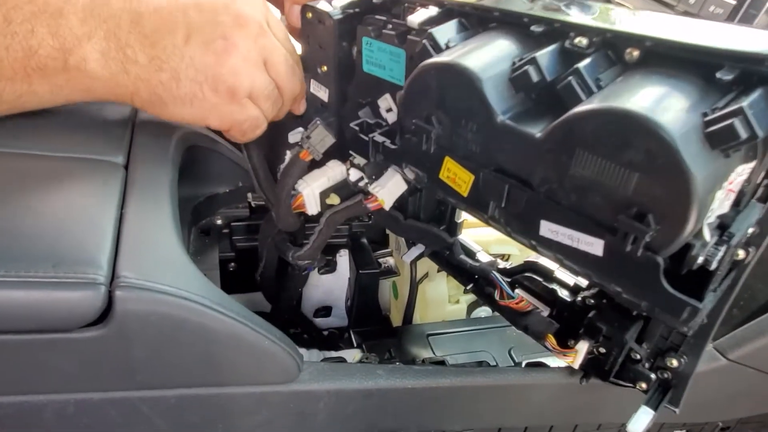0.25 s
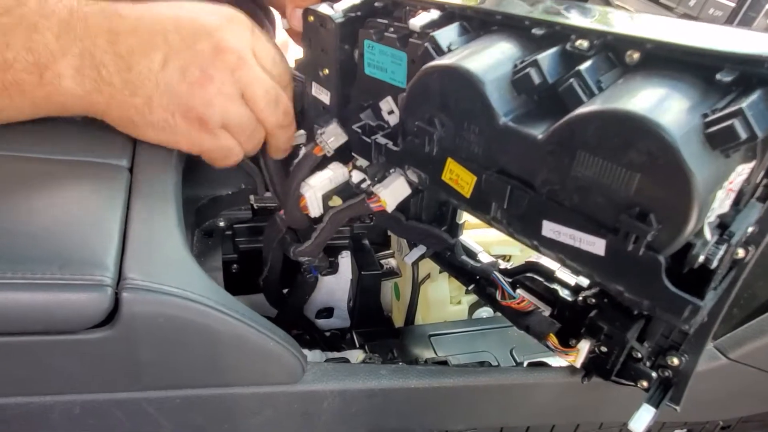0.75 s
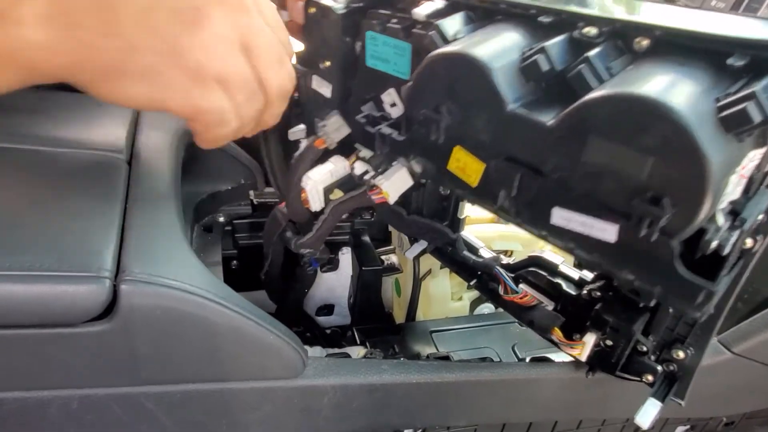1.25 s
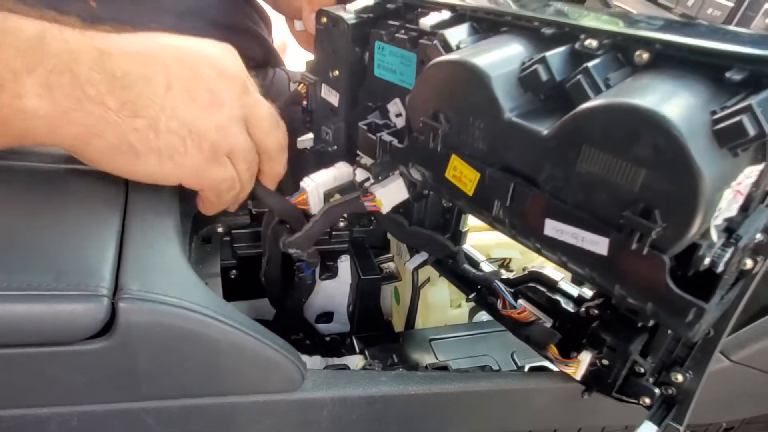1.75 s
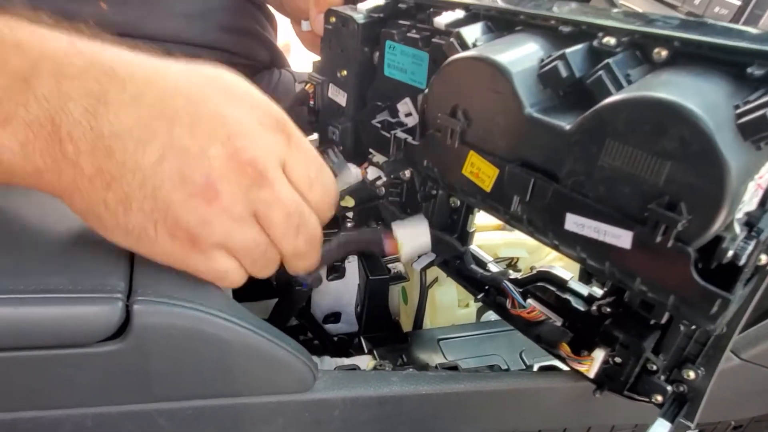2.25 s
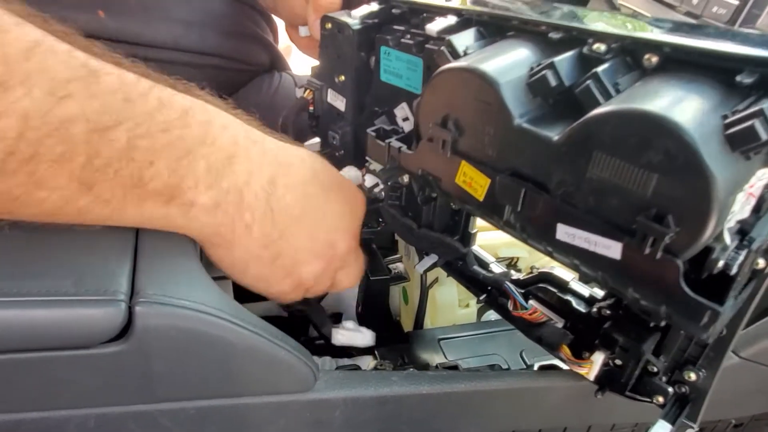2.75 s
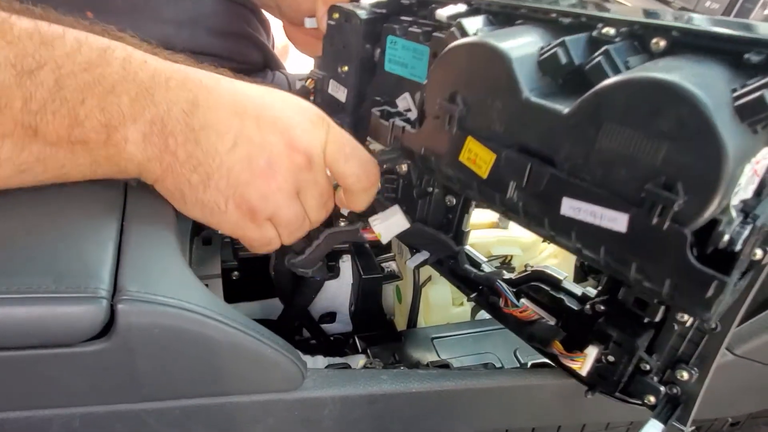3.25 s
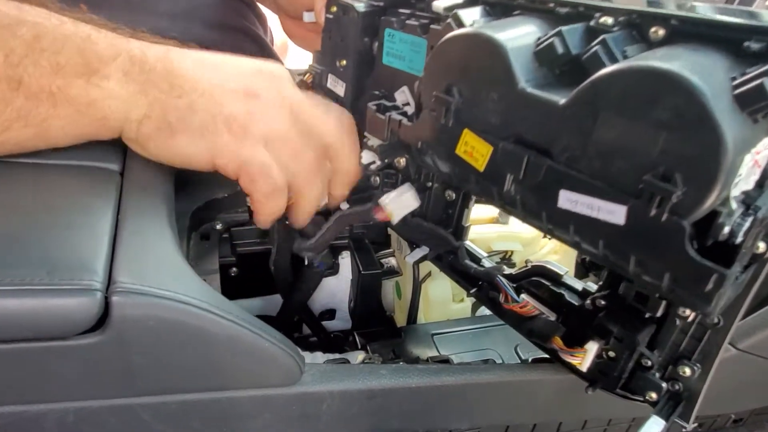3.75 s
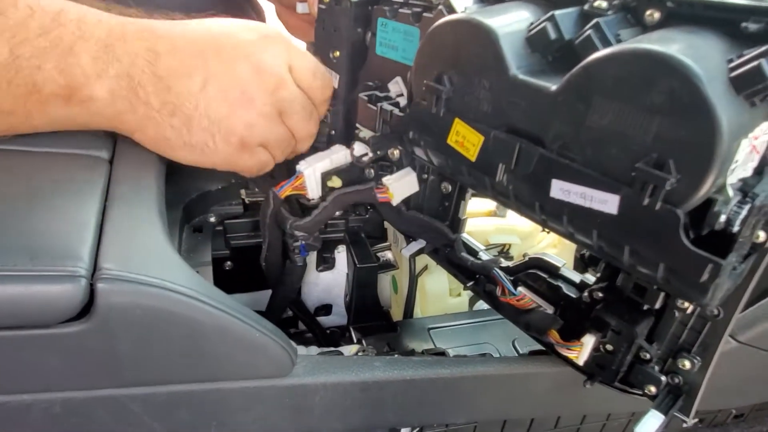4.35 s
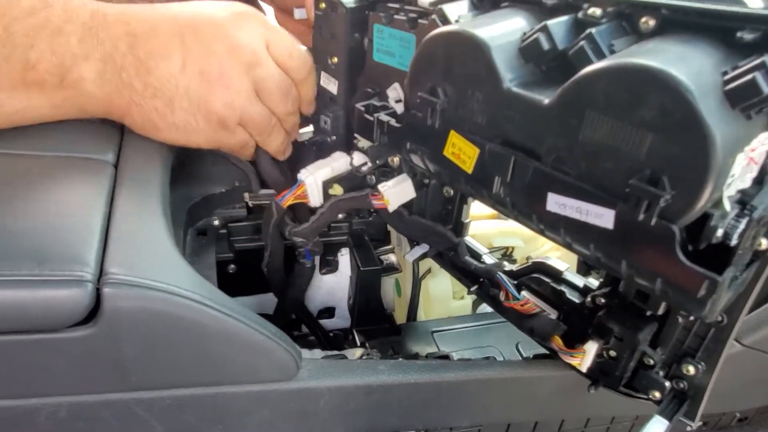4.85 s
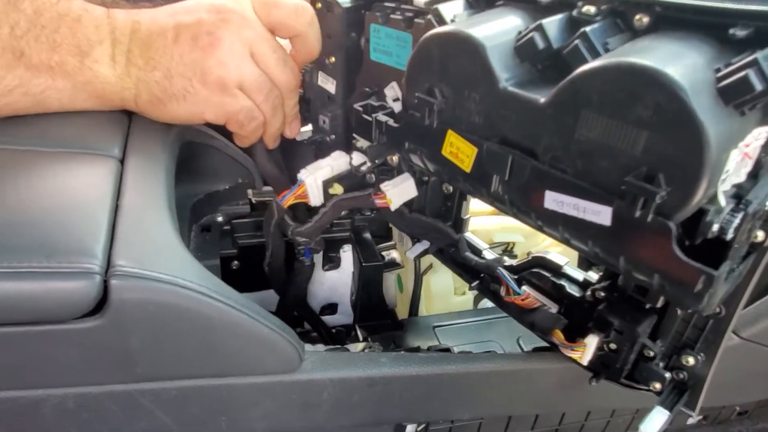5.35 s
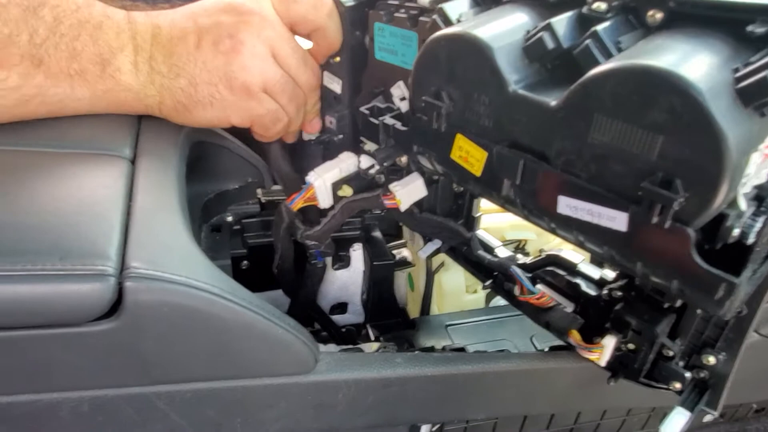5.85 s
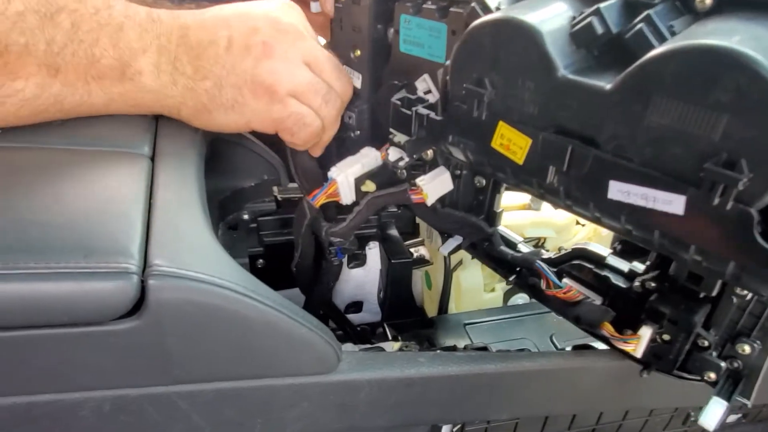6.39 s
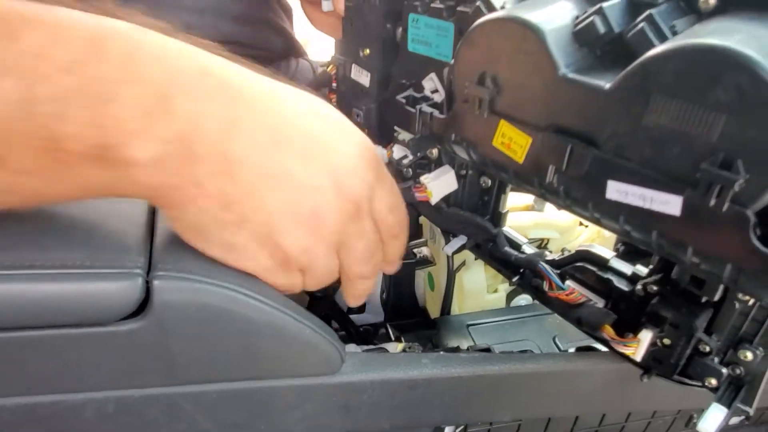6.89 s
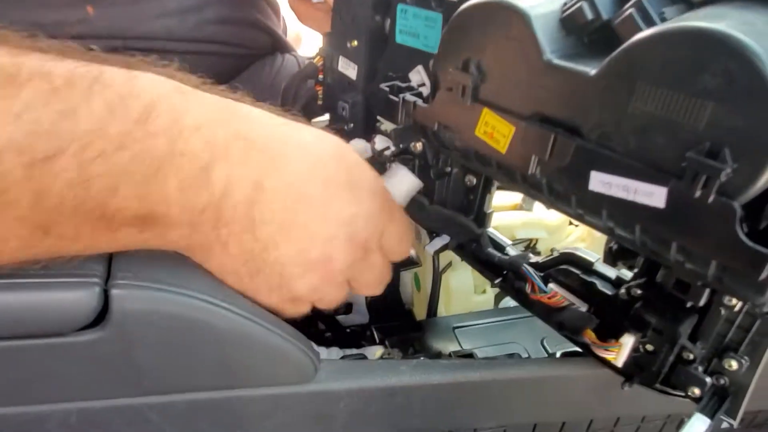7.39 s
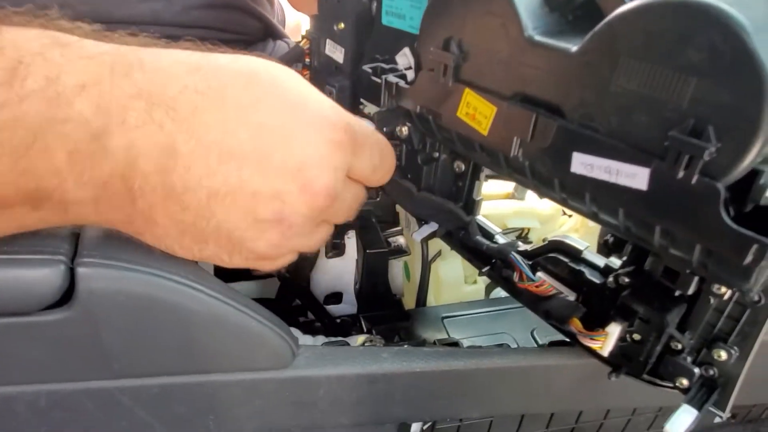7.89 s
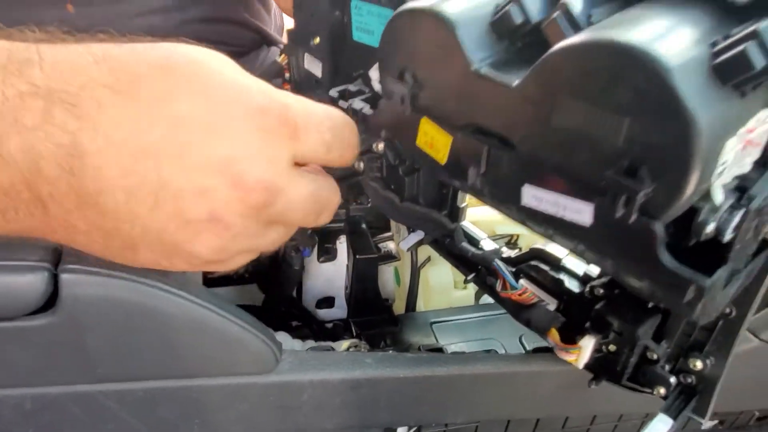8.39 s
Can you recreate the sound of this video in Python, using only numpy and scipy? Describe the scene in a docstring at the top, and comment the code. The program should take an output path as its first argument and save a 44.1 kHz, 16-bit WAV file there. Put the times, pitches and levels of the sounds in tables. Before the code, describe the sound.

Irregular plastic clicks, some sharp and snappy, others rounded and hollow, come from connectors knocking on car trim. Brief cable scuffs and skin rubs surround them, with soft low thuds as the hand pushes the console. A busy rattle fills the middle, then the activity thins, with one tiny rough squeak late on. Close-miked in a small, dry car interior with faint rumble.

```python
"""A hand tugs a wiring loom around the opened centre console of a parked car.
From the start the cabin rumbles faintly (shaped noise) while cables and a forearm drag (grainy noise).
Soon plastic connectors click on the hollow trim (decaying tones and noise), then plugs scuff it (gliding
resonances) and brisk strokes rub it (swelling noise). Later the hand bumps and pushes the console
(dull noise, low decaying tones), and near the end plastic squeaks once (a rough, falling tone)."""
import sys
import numpy as np
from scipy import signal
from scipy.fft import rfft, irfft, next_fast_len
from scipy.io import wavfile
from scipy.ndimage import map_coordinates

SR = 44100
rng = np.random.default_rng(int(sys.argv[2]) if len(sys.argv) > 2 else 0)


def wav_record(signal):
    """Record a signal, one row per channel, as 16-bit PCM in the file named by sys.argv[1]."""
    frames = np.transpose(np.atleast_2d(signal))
    bounded = np.clip(frames, -1, 1)
    # unit amplitude maps onto the largest positive 16-bit level
    quanta = np.round(bounded * 32767).astype(np.int16)
    wavfile.write(sys.argv[1], SR, quanta)


N = 380583  # length of the scene in samples


def amp(db):
    """Turn decibels into a gain."""
    return 10 ** (np.asarray(db) / 20)


def unit(x):
    """Scale a sound to an average (rms) strength of 1."""
    return x / np.sqrt(np.mean(x ** 2) + 1e-20)


def along(points, hz):
    """Read a curve of (Hz, value) points at any frequency, on a log frequency axis."""
    f, v = np.transpose(points)
    return np.interp(np.log(hz + 1), np.log(f + 1), v)


def fade(t, t60):
    """Die away by 60 dB in t60 seconds."""
    return np.exp(-np.log(1000) * t / t60)


def filtered(x, response):
    """Multiply the spectrum of x by a response that depends on frequency."""
    n = x.shape[-1]
    m = next_fast_len(n + 2048)
    return irfft(rfft(x, m) * response(np.fft.rfftfreq(m, 1 / SR)), m)[..., :n]


def wobble(rate):
    """Draw a smooth random curve as long as the scene, with rate random points a second."""
    points = rng.standard_normal(int(N * rate / SR) + 4)
    return map_coordinates(points, [np.arange(N) * rate / SR])


def delayed(x, s):
    """Make x later by s seconds."""
    return np.pad(x, (max(round(s * SR), 0), 0))[:len(x)]


def add(track, s, sound):
    """Mix a sound into the track at s seconds."""
    part = track[:, max(round(s * SR), 0):][:, :sound.shape[-1]]
    part += sound[..., :part.shape[-1]]


# how alike diffuse noise is at the two microphones: (frequency [Hz], likeness [1 = same, 0 = unrelated]);
# likeness above 1 counts as 1
ALIKE = [(60, 1.28), (290, 0.74), (640, .5), (1400, 0), (7000, 0.13)]


def noise(spectrum, size, grit_db=0):
    """Diffuse stereo noise of rms 1, alike in the bass; grit makes grains that ring in its resonances."""
    grains = map_coordinates(rng.standard_normal(size // 64 + 4), [np.arange(size) / 64], order=1)
    white = rng.standard_normal((2, size)) * amp(grit_db * grains)

    def mid_and_side(hz):
        turn = np.arccos(np.clip(along(ALIKE, hz), -1, 1)) / 2
        return amp(along(spectrum, hz)) * [np.cos(turn), np.sin(turn)]

    mid, side = filtered(white, mid_and_side)
    return unit(np.array([mid + side, mid - side]))


def spot(spectrum, colour_db):
    """The spectrum with the random resonances of one spot on the trim."""
    hz = np.geomspace(100, 16000, 60)
    return np.c_[hz, along(spectrum, hz) + colour_db * rng.standard_normal(len(hz))]


def ports(x, lead_s=0.00012):
    """The left microphone port hears a direct sound first, by an amount that depends on where it starts."""
    return np.array([x, delayed(x, lead_s * rng.uniform(0.56, 1.8))])


# ringing modes of the trim panel: (frequency [Hz], relative level [dB], time to fade by 60 dB [s])
PANEL = [(301, -16.5, 0.28), (499.7, 9.5, 0.063), (557.6, 6.5, 0.085), (748.5, -3, 0.092), (848, 0, 0.052),
         (1494, 7.5, 0.066), (1684, 0, 0.13), (1816, 3, 0.043), (2037, 5, 0.072), (3300, -12.5, 0.051),
         (3567, 6, 0.042), (3990, 0.5, 0.034)]
# spectrum of a plastic crack: (frequency [Hz], relative level [dB])
CRACK = [(250, -11.5), (900, 0), (1700, 6), (2500, 4), (3600, -1.5), (5000, -9), (7500, -14), (9500, -23),
         (13000, -16.5), (16000, -25.5)]


def contact(panel_db=-2, cabin_db=-3.5, crack_t60=0.012, cabin_t60=0.059, echo=0.34, echo_s=.0031,
            rise=0.01, colour_db=5):
    """One plastic contact: a crack, the panel's modes and the cabin's short answer."""
    t = np.arange(SR // 10) / SR
    hz, db, t60 = np.transpose(PANEL)[:, :, None]
    strength = amp(db + 5.8 * rng.standard_normal(hz.shape))  # each spot excites the modes differently
    tones = np.sin(2 * np.pi * (hz * t + rng.random(hz.shape)))
    panel = np.sum(strength * tones * fade(t, t60), axis=0)
    crack = noise(spot(CRACK, colour_db), len(t))[0] * fade(t, crack_t60)
    crack = crack + echo * delayed(crack, echo_s * rng.uniform(.85, 1.3))  # a near wall of the cabin
    direct = (unit(crack) + amp(panel_db) * unit(panel)) * (1 - fade(t, rise))
    cabin = noise(spot(CRACK, colour_db), len(t)) * fade(t, cabin_t60) * (1 - fade(t, 0.007))
    return unit(ports(direct)) + amp(cabin_db) * unit(cabin)


# spectrum of the noise in the car: (frequency [Hz], relative level [dB])
RUMBLE = [(20, -1.5), (75, 5), (130, -5.5), (280, -18.5), (520, -19.5), (900, -22.5), (2500, -29.5),
          (6500, -35.5), (8500, -45.5), (15000, -38.5)]


def cabin_rumble(rumble_db=-53.5):
    """Low outdoor noise and a faint hiss fill the car, wavering slightly."""
    return amp(rumble_db + 0.43 * wobble(3.4)) * noise(RUMBLE, N)


# slow drag of loom and forearm: (time [s], relative cable scrape level [dB], relative skin hiss level [dB])
DRAG = [(0.0, -67, -86.5), (0.53, -78, -100), (0.641, -55, -63), (2.042, -62, -67), (2.481, -57.5, -62),
        (3.22, -52, -66), (3.629, -54, -65), (3.74, -74.5, -81), (3.97, -53, -54), (4.44, -59.5, -70.5),
        (4.8, -53.5, -63.5), (5.7, -56, -60), (5.9, -55, -77.5), (6.301, -54, -69), (6.66, -57, -58),
        (7.702, -75.5, -71.5), (8.63, -56, -68)]
# spectrum of cable scraping on trim: (frequency [Hz], relative level [dB])
SCRAPE = [(100, 3), (300, -6.5), (400, 1), (520, 5.5), (700, -4), (1050, -2), (1800, -2), (2800, -10.5),
          (4500, -22.5), (9000, -49)]
# spectrum of skin hissing on trim: (frequency [Hz], relative level [dB])
HISS = [(800, -26), (2500, -1), (4200, 0.5), (7200, 0), (8500, -12), (12500, -4.5), (16000, -10)]


def dragging(cable_db=-3, skin_db=-4, colour_db=4, grit_db=6, skin_grit_db=2, creep_db=3,
             ticks_per_s=12, loose_db=-13, loose_range_db=10):
    """The loom and forearm creep from spot to spot over the trim, and loose plugs tick."""
    s, *levels = np.transpose(DRAG)
    scrape, hiss = (np.interp(np.arange(N) / SR, s, db) for db in levels)
    cable, skin, ticks = np.zeros((3, 2, N))
    # half-second stretches, each on a new spot, overlap by half
    window = np.sin(np.linspace(0, np.pi, SR // 2))
    for start in np.arange(0, N, len(window) // 2) / SR:
        add(cable, start, window * noise(spot(SCRAPE, colour_db), len(window), grit_db))
        add(skin, start, window * noise(spot(HISS, colour_db / 2), len(window), skin_grit_db))
    for when, force in rng.random((round(ticks_per_s * N / SR), 2)):
        tick_db = scrape[int(when * N)] + loose_db + loose_range_db * force
        add(ticks, when * N / SR, amp(tick_db) * contact())
    drag = amp(scrape + cable_db) * cable + amp(hiss + skin_db) * skin
    return amp(creep_db * wobble(22)) * drag + ticks  # the drag is uneven


def shell(pitch, hold=0.0038, rise=0.0044, t60=0.016, ring_db=-27, ring_hz=1705, ring_t60=0.08,
          tuning_octaves=0.12, wall_db=-13):
    """A hollow shell sounds during contact and dies fast; the nearer its pitch to the panel's, the more it rings."""
    t = np.arange(SR // 10) / SR
    # lower and upper wall modes, changed by the grip
    walls = pitch * rng.uniform([[.66], [1.17]], [[.86], [1.45]])
    note = np.sin(2 * np.pi * pitch * t) + amp(wall_db) * np.sin(2 * np.pi * walls * t).sum(axis=0)
    brevity = min(pitch / ring_hz, 1) ** 2  # low, blunt contacts are over sooner
    note = note * fade(np.maximum(t - hold * brevity, 0), t60 * brevity)
    sympathy = 1 / np.hypot(1, np.log2(pitch / ring_hz) / tuning_octaves)
    ring_tone = np.sin(2 * np.pi * ring_hz * rng.normal(1, 0.018) * t)
    ring = sympathy * amp(ring_db) * ring_tone * fade(t, ring_t60)
    return unit(ports((note + ring) * (1 - fade(t, rise))))


# connector strikes:
# (time [s], shell pitch [Hz], shell level [dB], hardness [0-1], panel knock level [dB])
CLICKS = [(0.144, 1580, -56, 0.35, -44), (0.242, 1890, -33.5, 0.25, -42.5), (0.298, 1634, -24, 0.55, -36.5),
          (0.432, 1620, -48.5, 0.48, -45), (0.593, 1540, -43.5, 0.62, -51.5), (0.705, 1630, -35, 0.25, -49),
          (1.011, 1477, -19.5, 0.54, -24), (1.028, 1930, -20, 0.8, -33.5), (1.244, 1530, -34, 0, -40),
          (1.272, 1570, -44, 0.83, -46.5), (1.466, 1500, -46.5, 0.9, -46.5),
          (1.512, 1575, -23, 0.35, -34.5), (1.57, 1710, -31.5, 0.31, -37), (2.482, 1130, -32, 0.53, -61),
          (2.611, 1230, -36, 0.24, -52.5), (2.632, 1280, -26, 0, -50), (2.644, 1640, -28, 0.14, -51),
          (2.666, 1190, -35.5, 0.27, -47), (2.872, 990, -39, 0.6, -39.5), (3.154, 1570, -30, 0.59, -37),
          (3.323, 1600, -29, 0.58, -32.5), (3.351, 930, -38.5, 0.1, -56), (3.7879, 1750, -23, 0.51, -33.5),
          (3.821, 1690, -25, 0.38, -38.5), (3.836, 1910, -35.5, 0.4, -45), (3.92, 1670, -27.5, 0.46, -32),
          (3.927, 1680, -21.5, 0.4, -39.5), (3.936, 1570, -26.5, 0.33, -42), (3.965, 1470, -36, 0.5, -36.5),
          (4.008, 1880, -31, 0.46, -54), (4.133, 2030, -22.5, 0.41, -37), (4.138, 1680, -31, 0.54, -38.5),
          (4.257, 2996, -22, 0.08, -46), (4.335, 1680, -20.5, 0.24, -48), (4.3484, 1720, -18, 0.11, -37.5),
          (4.3903, 1680, -19.5, 0.26, -37.5), (4.482, 1734, -23.5, 0, -40),
          (4.4924, 1678, -12.5, 0.14, -54), (4.859, 1485, -40, 0.4, -46.5), (5.37, 1550, -39, 0, -53),
          (5.594, 1524, -30.5, 0.23, -39.5), (6.005, 1660, -36, 0.31, -53), (6.349, 1440, -31, 0.81, -35.5),
          (7.012, 1640, -42.5, 0.23, -61), (7.039, 1070, -33, 0.49, -44),
          (7.4514, 1727, -23.5, 0.51, -27.5), (7.503, 1154, -39.5, 0.31, -43.5),
          (7.519, 1460, -43.5, 0.27, -44), (7.552, 1830, -44.5, 0.72, -44), (7.816, 2134, -30, 0.27, -40.5),
          (8.108, 1740, -51.5, 0.52, -55), (8.209, 1840, -54.5, 0.74, -56.5),
          (8.32, 1810, -48.5, 0.49, -56.5), (8.544, 1810, -46.5, 0.33, -68)]
# frequency ranges of shell, knock, edge and snap, one row each: (low [Hz], high [Hz])
RANGES = [(900, 2400), (290, 900), (2250, 4600), (5600, 16000)]
# edge and snap relative to the shell, one row each: (level when blunt [dB], gain at full hardness [dB])
TOUCH = [(-17.5, 24), (-38.5, 45.5)]


def connectors(rattle_db=9, lead_in_db=-12, lead_in_t60=0.045, lead_in_grit_db=5):
    """Connectors strike, each after a short swell of faint noise; hardness sets the edge and snap."""
    out = np.zeros((2, N))
    filters = [signal.butter(3, edges, "bandpass", fs=SR, output="sos") for edges in RANGES]
    span = SR / 100  # a level is the click's energy spread over 10 ms
    before = np.arange(SR // 30)[::-1] / SR  # seconds left until the strike
    for s, pitch, shell_db, hardness, knock_db in CLICKS:
        edge_db, snap_db = (shell_db + blunt_db + hard_db * hardness for blunt_db, hard_db in TOUCH)
        hit = contact()
        parts = [unit(signal.sosfilt(sos, hit)) for sos in filters]
        # a blunt contact gives the shell's clean note, a hard one rattles the whole panel
        rattle = amp(rattle_db + edge_db - shell_db)
        parts[0] = unit(shell(pitch) + rattle * parts[0])
        levels = (shell_db, knock_db, edge_db, snap_db)
        click = sum(amp(db) * part for db, part in zip(levels, parts))
        add(out, s - .0005, click * np.sqrt(span / hit.shape[1]))
        lead_in = noise(CRACK, len(before), lead_in_grit_db) * fade(before, lead_in_t60)
        add(out, s - before[0], amp((shell_db + edge_db) / 2 + lead_in_db) * lead_in)
    return out


# plugs and taped cable scuff the trim:
# (middle [s], half length [s], resonance at the middle [Hz], glide [octaves/s], level [dB])
SCUFFS = [(0.148, 0.0057, 4750, -1.5, -49.5), (3.071, 0.027, 1150, 3, -43.5),
          (3.188, 0.011, 1356, -18, -39), (3.773, 0.012, 1310, 13.5, -42), (6.28, 0.011, 1510, -1, -49),
          (6.665, 0.02, 2760, 7.5, -42)]
# resonances of a scuff: (multiple of the lowest [ratio], relative level [dB])
SCUFF_MODES = [(1, 0.5), (1.601, -11), (2.7, -17)]


def scuffs(width=0.21, grit_db=1.5):
    """Friction rings in a few broad resonances that shift as the contact point slides."""
    out = np.zeros((2, N))
    for s, half, hz, glide, db in SCUFFS:
        t = np.arange(-2 * half, 2 * half, 1 / SR)
        phase = 2 * np.pi * np.cumsum(hz * 2 ** (glide * t)) / SR
        # slow noise on each tone broadens it into a resonance
        sos = signal.butter(2, width * hz, fs=SR, output="sos")
        slips = signal.sosfilt(sos, rng.standard_normal((len(SCUFF_MODES), 2, len(t))))
        ring = 0
        for (k, level), (a, b) in zip(SCUFF_MODES, slips):
            ring = ring + amp(level) * (a * np.cos(k * phase) + b * np.sin(k * phase))
        grit = amp(grit_db * np.interp(t, np.linspace(t[0], t[-1], 20), rng.standard_normal(20)))
        swell = np.exp(-(t / half) ** 2)
        add(out, s + t[0], ports(amp(db) * unit(ring * grit) * swell))
    return out


# brisk strokes of hand and cable over the trim:
# (middle [s], half length [s], relative level [dB], skin hiss over the scrape [dB])
STROKES = [(0.282, 0.022, -49.5, -29.5), (0.959, 0.098, -49.5, -19.5), (1.173, 0.039, -47.5, -14),
           (1.298, 0.058, -45, -13), (1.659, 0.086, -55, -4.5), (1.93, 0.045, -58.5, 0),
           (2.509, 0.12, -51.5, -2.5), (2.644, 0.021, -40.5, -25.5), (2.884, 0.098, -51, -6.5),
           (3.106, 0.054, -51, -1.5), (3.299, 0.13, -51, -7), (3.808, 0.058, -54, -7.5),
           (3.89, 0.029, -48, -1.5), (5.159, 0.088, -52, -18.5), (5.788, 0.05, -48, -28.5),
           (6.208, 0.03, -50, -27), (6.296, 0.025, -46.5, -32), (6.61, 0.12, -49, -16.5),
           (6.728, 0.067, -60.5, 3.5), (7.055, 0.056, -54.5, -8), (7.209, 0.041, -53, -2)]


def rubbing(colour_db=4, grit_db=6, skin_grit_db=4, tick_db=-11, count=5):
    """Each stroke swells and fades, wakes its own resonances in the trim and sheds a few tiny ticks."""
    scrapes, ticks = np.zeros((2, N)), np.zeros((2, N))
    for s, half, db, skin_db in STROKES:
        t = np.arange(-2 * half, 2 * half, 1 / SR)
        cable = amp(db) * noise(spot(SCRAPE, colour_db), len(t), grit_db)
        skin = amp(db + skin_db) * noise(HISS, len(t), skin_grit_db)
        swell = np.exp(-(t / half) ** 2)
        add(scrapes, s + t[0], (cable + skin) * swell)
        for when, force in rng.standard_normal((count, 2)):
            add(ticks, s + .5 * half * when, amp(db + tick_db + 2 * force) * contact())
    grip_db = 4.0 * wobble(25) + 2.3 * wobble(90)  # the surfaces catch and slip
    return amp(grip_db) * scrapes + ticks


# blows of hand and loom on the console, also played by pushes():
# (time [s], relative dull knock level [dB], relative push level [dB])
BUMPS = [(0.901, -49.5, -35), (1.013, -29.5, -35.5), (1.143, -36.5, -59), (1.18, -32.5, -57.5),
         (1.29, -52, -31.5), (2.484, -31, -30), (2.871, -46.5, -32.5), (3.2, -41, -38.5),
         (3.325, -29.5, -29.5), (3.523, -29, -38), (3.792, -34.5, -30.5), (3.979, -23, -38),
         (5.118, -46, -32.5), (5.84, -36, -38), (6.272, -24, -37.5), (6.536, -53, -34.5),
         (7.047, -38, -35.5)]
# spectrum of a dull knock: (frequency [Hz], relative level [dB])
THUD = [(80, -10), (145, 3), (200, -3.5), (300, 1.5), (450, -1.5), (900, -5.5), (3000, -36)]
# air resonances of the hollow console: one frequency [Hz] each
HOLLOW = [189.5, 294.7]


def thuds(thud_db=-8.5, hollow_db=-1, t60=0.16, rise=0.009):
    """Flesh and taped cable give dull knocks that wake the hollow of the console."""
    out, t = np.zeros((2, N)), np.arange(SR // 6) / SR
    for s, db, _ in BUMPS:
        hollow = sum(np.sin(2 * np.pi * (hz * t + rng.random())) for hz in HOLLOW)
        knock = noise(THUD, len(t)) + amp(hollow_db) * hollow
        add(out, s, amp(db + thud_db) * knock * fade(t, t60) * (1 - fade(t, rise)))
    return out


def pushes(boom_db=-1, boom_hz=68, sway_hz=38, sway_db=-8, t60=0.24, rise=0.0082,
           rock_back_s=0.062, rock_back_db=-3):
    """A push rocks the console forth and back on its mounts and booms in the cabin."""
    out, t = np.zeros((2, N)), np.arange(SR // 3) / SR
    for s, _, db in BUMPS:
        for lag, change_db in (0, 0), (rock_back_s, rock_back_db):
            hz = np.array([[boom_hz], [sway_hz]]) * np.exp(rng.normal(0, 0.12, (2, 1)))
            boom, sway = np.sin(2 * np.pi * (hz * t + rng.random((2, 1))))
            rocking = (boom + amp(sway_db) * sway) * fade(t, t60) * (1 - fade(t, rise))
            add(out, s + lag, amp(db + boom_db + change_db) * rocking)
    return out


def squeak(middle_s=7.388, half=0.024, pitch_hz=1450, fall_octaves_per_s=7, squeak_db=-49, jitter=0.12):
    """Plastic sticks and slips on plastic for a moment: a thin, rough, falling squeak."""
    t = np.arange(-3 * half, 3 * half, 1 / SR)
    rate = pitch_hz * 2 ** (-fall_octaves_per_s * t) * (1 + jitter * wobble(2100)[:len(t)])
    phase = 2 * np.pi * np.cumsum(rate) / SR
    tone = sum(np.sin(k * phase) / np.sqrt(k) for k in range(1, 4))
    level = amp(squeak_db + 7.6 * np.tanh(wobble(175)[:len(t)]))
    out = np.zeros((2, N))
    add(out, middle_s + t[0], ports(level * tone * np.exp(-(t / half) ** 2)))
    return out


# balance of the two sides: (frequency [Hz], left minus right [dB])
LEAN = [(60, -1.5), (200, 0.5), (400, -3), (700, -0.5), (1400, -6.5), (2400, -3), (4400, -8), (8000, 0.5),
        (14000, 3.5)]


def scene():
    """All sounds of the work, leaning to the right in the middle range."""
    both = cabin_rumble() + dragging() + connectors() + scuffs() + rubbing() + thuds() + pushes() + squeak()

    def balance(hz):
        sides = amp(np.outer([.5, -.5], along(LEAN, hz)))
        return sides / np.sqrt(np.mean(sides ** 2, axis=0))  # keep the total power

    return filtered(both, balance)


def record(dry, top_hz=16000):
    """Keep nothing above the band limit."""
    return filtered(dry, lambda hz: hz < top_hz)


dry = scene()
out = record(dry)
wav_record(out)
```